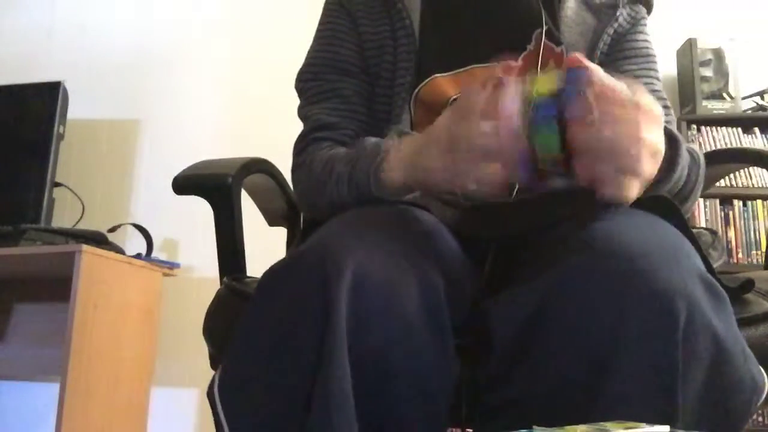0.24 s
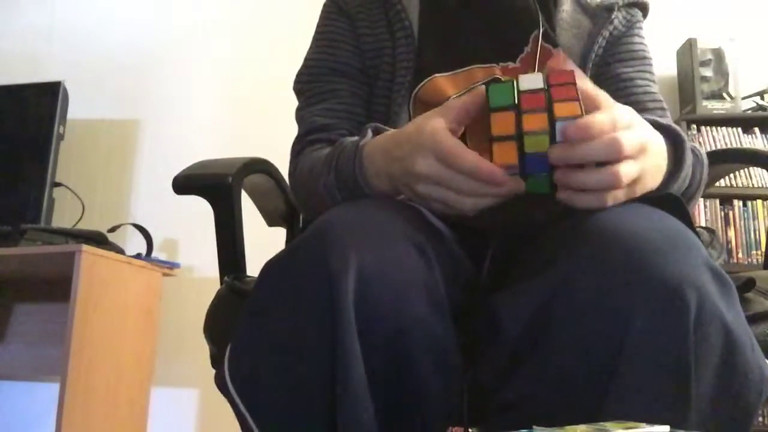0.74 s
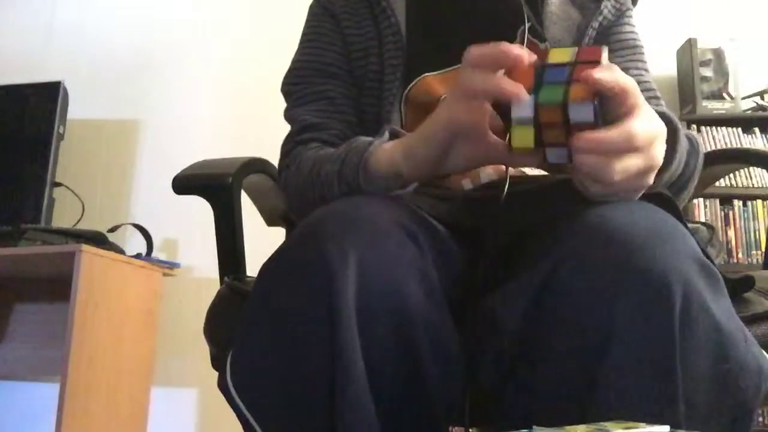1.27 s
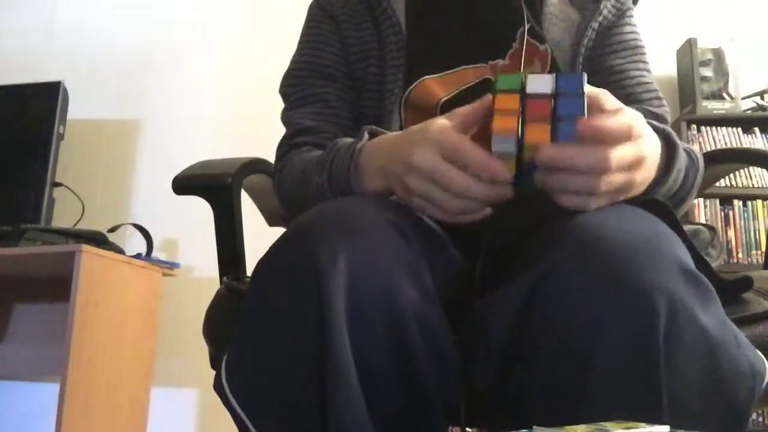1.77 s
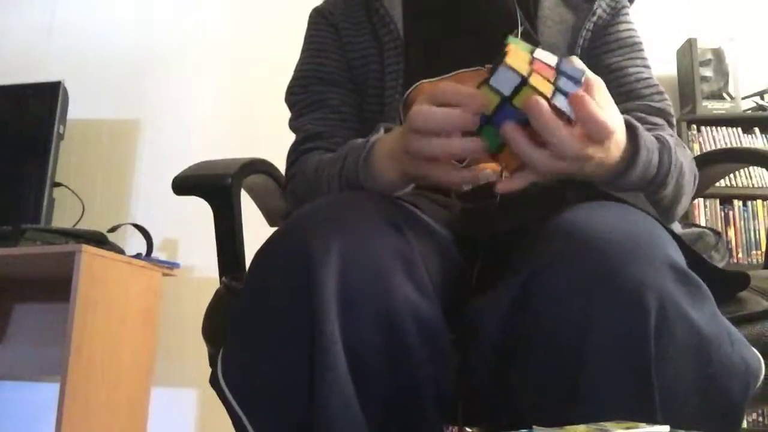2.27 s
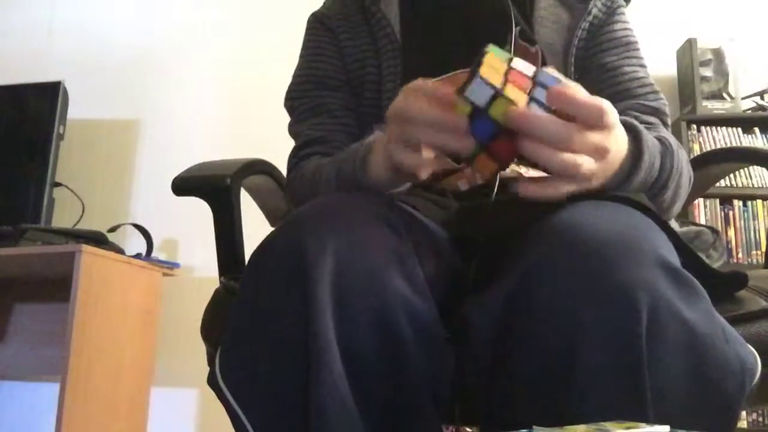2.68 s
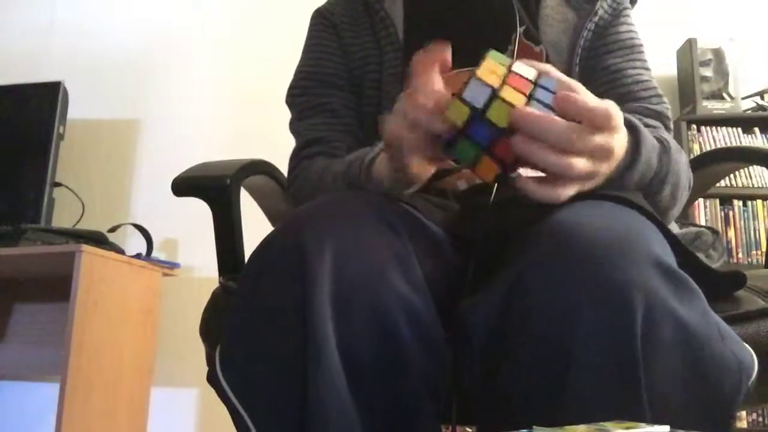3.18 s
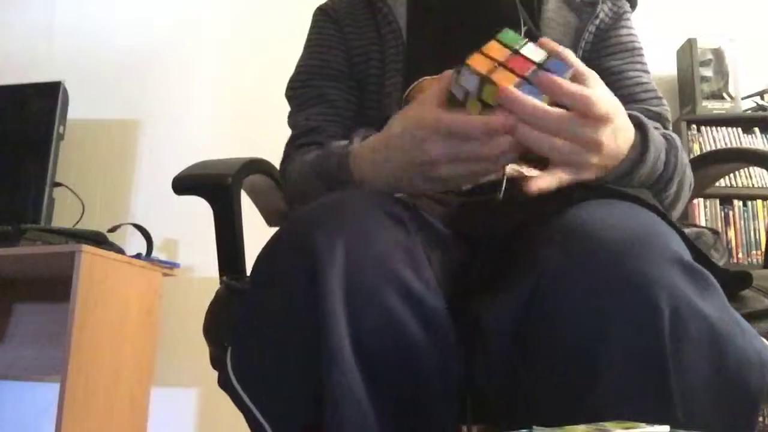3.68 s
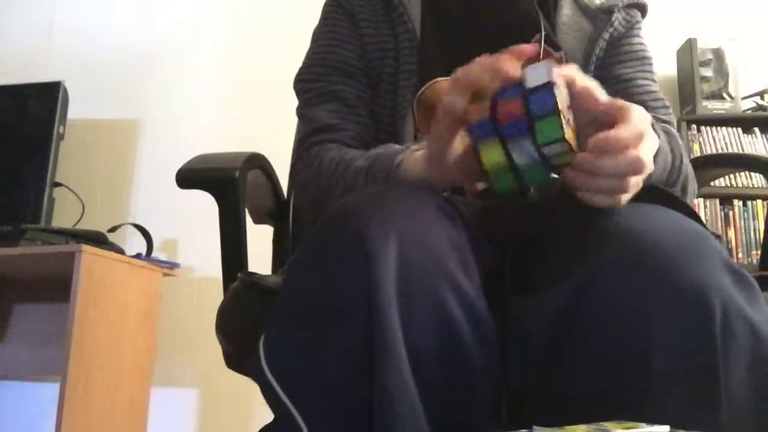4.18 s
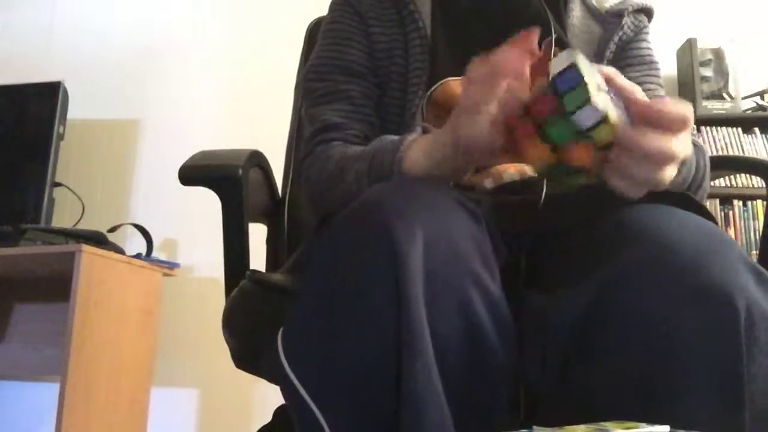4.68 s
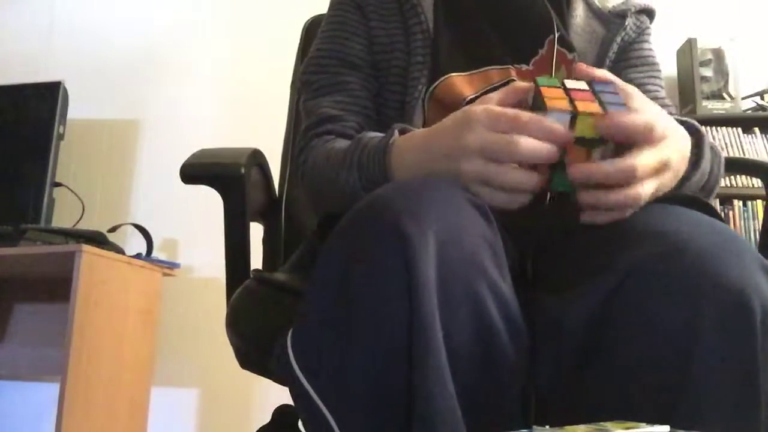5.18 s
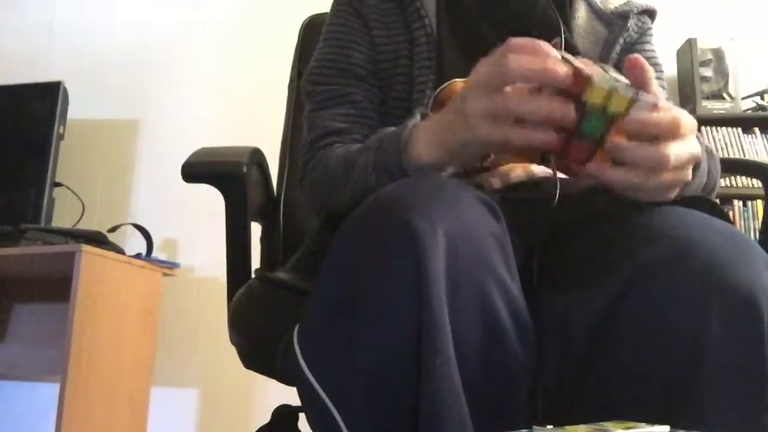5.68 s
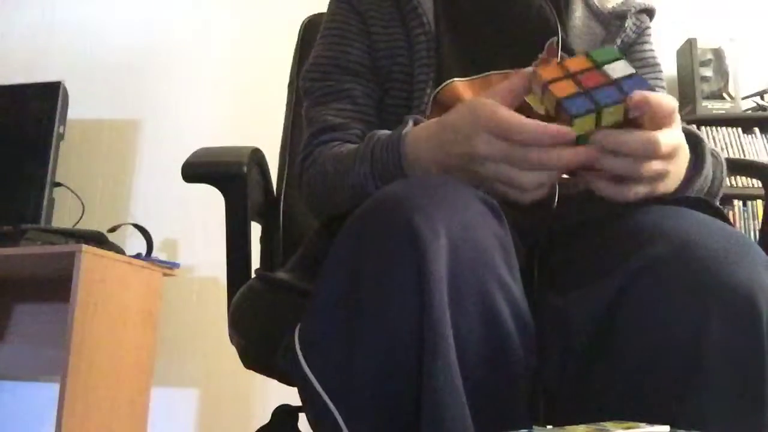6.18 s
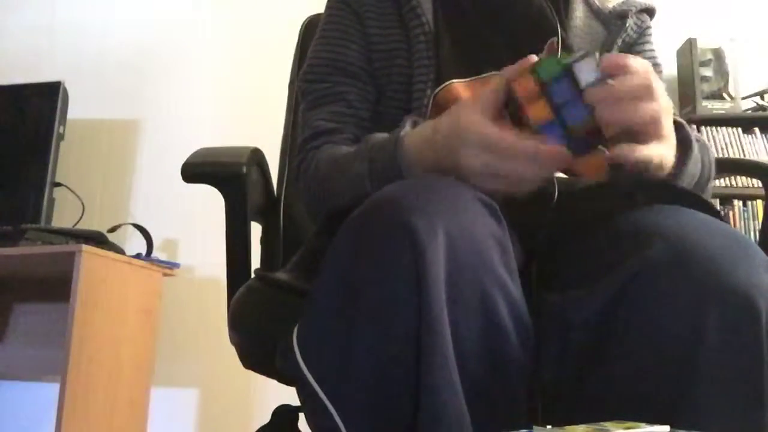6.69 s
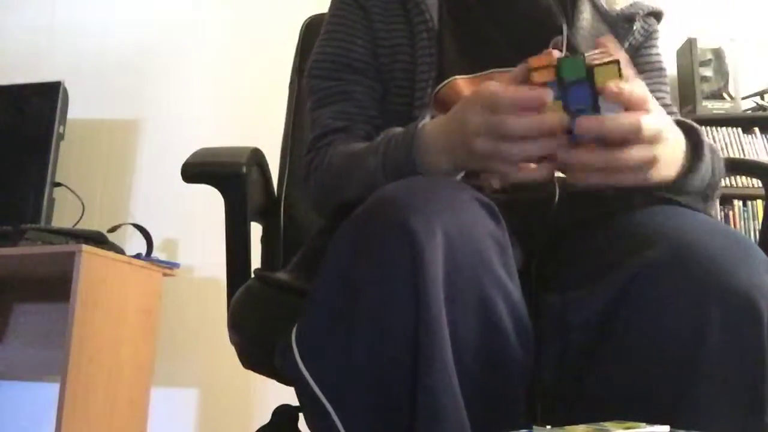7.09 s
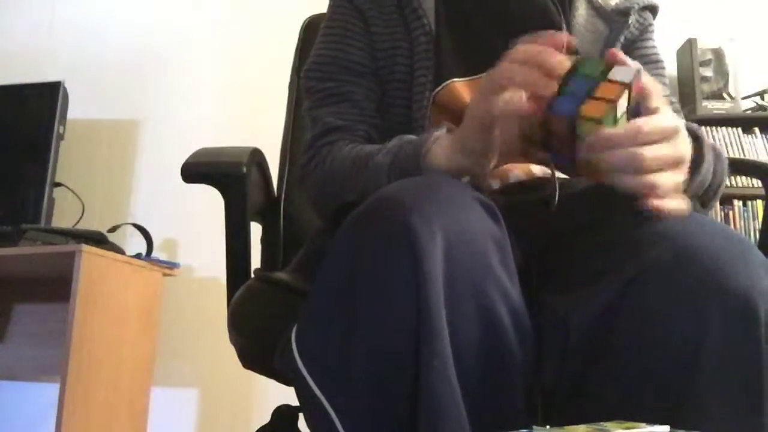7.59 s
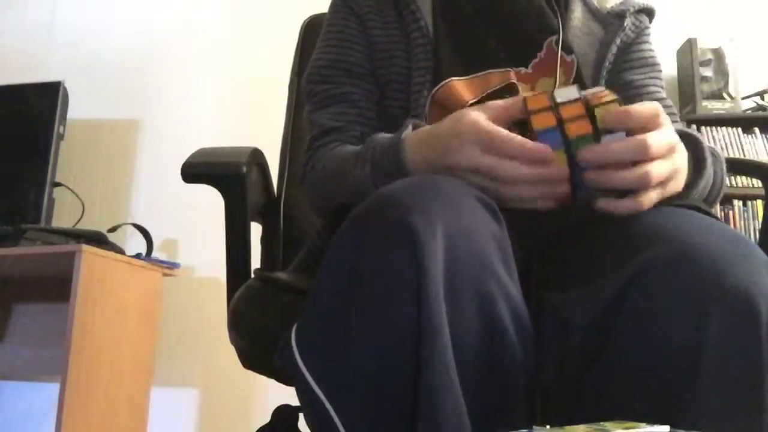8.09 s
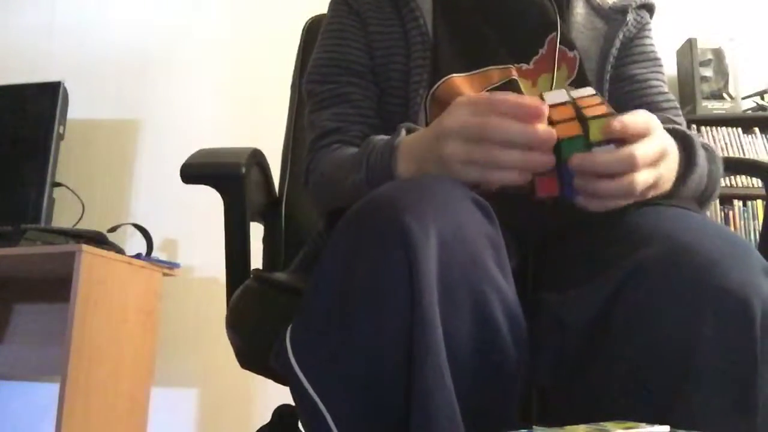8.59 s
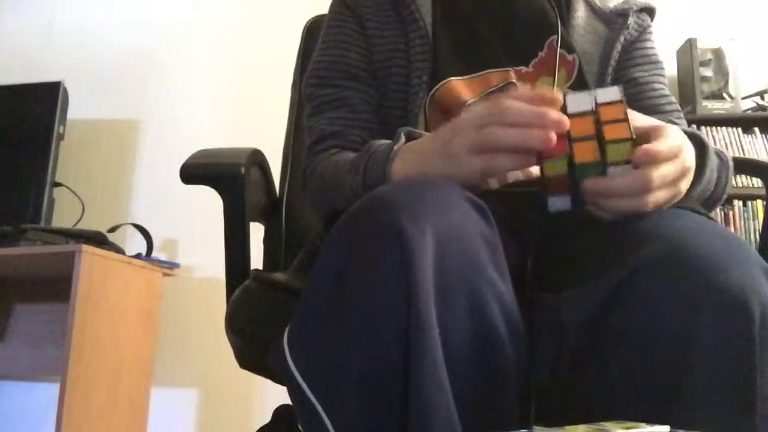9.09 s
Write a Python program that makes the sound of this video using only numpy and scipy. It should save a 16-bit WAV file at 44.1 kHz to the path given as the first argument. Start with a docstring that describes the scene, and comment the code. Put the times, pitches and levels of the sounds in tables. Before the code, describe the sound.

A plastic puzzle cube twisted in the hands, irregular clicks and clacks in bursts, a loud flurry and sharp microphone raps around seven seconds.

```python
"""Plastic puzzle cube in a live room

A cube is twisted in the hands: its pieces tick, scrape and clack as noise-driven blows ring damped modes.
Sliding layers rattle as trains of random slips; short pips and a thin spring ring are decaying sines.
The room answers with decaying noise. Near the microphone come a brush and sharp raps that ring its case.
There are also dull bumps, a boom and one faint falling squeak, a wavering sine with a rough catch.
Shaped noise makes the room air, hiss, faint hum and low rumble that lie under it all."""
import sys
import numpy as np
from scipy import signal
from scipy.fft import rfft, irfft, next_fast_len
from scipy.io import wavfile

SR = 44100
rng = np.random.default_rng(int(sys.argv[2]) if len(sys.argv) > 2 else 0)


def to_wav(sig):
    """Store sig (one row per channel, or 1-D mono) as 16-bit WAV at the path in sys.argv[1].

    Samples outside -1..1 are clipped; the rate is SR.
    """
    pcm = np.clip(np.atleast_2d(sig), -1, 1) * 32767
    pcm = np.round(pcm).astype(np.int16)
    wavfile.write(sys.argv[1], SR, pcm.T)  # frames by channels


N = 411894  # length in samples

# Prominent clacks, piece on piece: t/s, body level/dB, snap level relative to body/dB, hardness as a ring f/Hz
CLACKS = [(.111, -53.5, -3, 1460), (.165, -34.5, -7.5, 1770), (.264, -44, -18, 1660),
          (.277, -48, -21, 1560), (.286, -38, -9.5, 1630), (.328, -35, -4, 1540), (.344, -40, -19, 1870),
          (.38, -42.5, -8, 1650), (.883, -50, -11, 1500), (.903, -36.5, -13, 1470), (.998, -50, -9.5, 1430),
          (1.187, -47, -10, 1440), (1.199, -40.5, -6.5, 1700), (1.211, -38.5, -6, 1640),
          (1.233, -43.5, -5, 1500), (1.296, -51, -4.5, 1600), (1.365, -51.5, -22, 1350),
          (1.39, -48.5, -14.5, 1610), (1.453, -60, -10, 1326), (1.614, -60, -10, 1654),
          (1.724, -45.5, -5.5, 1650), (1.851, -32.5, -12.5, 1510), (1.991, -43, -37, 1460),
          (2.005, -38.5, -6, 1400), (2.123, -41.5, -6.5, 1640), (2.211, -57.5, -13, 1480),
          (2.384, -57, -7, 1570), (2.417, -59.5, -5, 1290), (2.654, -51, -7, 1640),
          (2.676, -36.5, -4, 1520), (2.762, -56.5, -16, 1500), (2.887, -56.5, 0, 1570),
          (2.965, -41, -6.5, 1520), (3.012, -45.5, -3.5, 1660), (3.034, -48.5, -2, 1420),
          (3.18, -40.5, -8, 1490), (3.193, -31, 0.5, 1540), (3.298, -44, 0.5, 1550),
          (3.583, -51.5, -7.5, 1690), (3.775, -56, 0, 1400), (3.796, -45, -2, 1620),
          (3.815, -37.5, -5, 1300), (3.826, -30, -2, 1800), (3.839, -36, -2, 1810), (3.919, -52.5, 2, 1200),
          (4.213, -43.5, -6.5, 1450), (4.533, -46, -9, 1430), (4.576, -43.5, -7.5, 1420),
          (4.615, -47, -1.5, 1470), (4.761, -49.5, -8, 1360), (4.83, -46.5, -8.5, 1630),
          (5.003, -59.5, -11, 1650), (5.179, -61, 9, 1540), (5.279, -47.5, 0, 1900),
          (5.339, -47, -6.5, 1750), (5.419, -45, -10.5, 1300), (5.545, -53.5, -17, 1670),
          (5.593, -48.5, -8.5, 1670), (5.621, -63.5, 4, 1620), (5.666, -49, 1, 1600),
          (5.677, -44.5, -15, 1540), (5.7, -37, -3, 1650), (5.8, -44, -5, 1750), (5.988, -59.5, -1, 1800),
          (6.172, -46.5, -4.5, 1360), (6.35, -53, -14, 1540), (6.466, -45, -5, 1530), (6.482, -44, 0, 1650),
          (6.53, -41.5, -4, 1580), (6.646, -28, 2.5, 1470), (6.66, -30.5, -1, 1470),
          (6.669, -38.5, 6.5, 1600), (6.689, -29.5, -2.5, 1490), (6.78, -39, -4, 1950),
          (6.795, -35, -12.5, 1710), (6.817, -49.5, -4.5, 1550), (6.836, -42, 3, 1670),
          (6.847, -42, -2.5, 1820), (6.897, -41, -3, 1770), (6.915, -32, -7.5, 1690), (6.923, -40, 5, 1540),
          (6.93, -31.5, 2.5, 1700), (6.944, -23.5, 4, 1760), (6.951, -31, 1, 1600), (7.323, -51, -4, 1580),
          (7.338, -47, -1.5, 1570), (7.367, -37.5, -1.5, 1480), (7.381, -37.5, -10, 1870),
          (7.477, -34.5, -1, 1370), (7.507, -34.5, -5, 1750), (7.52, -42, -4, 1440),
          (7.58, -39.5, -7, 1700), (7.614, -49, 10, 1380), (7.643, -46.5, -3, 1980), (7.697, -44, -7, 1490),
          (7.717, -32, -7, 1390), (7.728, -40, 0, 1520), (7.756, -33.5, 2, 1570), (7.766, -42, -2, 1370),
          (7.844, -49.5, 3, 1400), (7.88, -42, -4, 1510), (7.887, -38.5, -3.5, 1660),
          (7.974, -43.5, -5, 1580), (7.991, -38.5, -14, 1490), (8.021, -37.5, -1.5, 1400),
          (8.034, -35.5, -2.5, 1530), (8.211, -51.5, -13, 1550), (8.261, -53, -5, 1850),
          (8.368, -47, -7.5, 1610), (8.52, -55, -13.5, 1470), (8.697, -46.5, -6.5, 1630),
          (8.709, -45, -13, 1610), (8.839, -41, -20, 1590), (9.206, -42.5, -12, 1450),
          (9.216, -37.5, -10.5, 1400), (9.245, -47, -15, 1580), (9.305, -46.5, -18, 1500)]
# Modes of the hollow cube: f/Hz, nominal width/Hz, relative level/dB
BODY_MODES = [(584, 210, -14), (847, 110, -5), (1164, 134, -2), (1395, 245, 2), (1550, 283, 2),
              (1822, 266, -3), (2244, 380, -12), (2960, 420, -16)]
# Modes of the pieces' thin walls: f/Hz, nominal width/Hz, relative level/dB
WALL_MODES = [(3850, 570, -5.5), (4676, 900, -2.5), (5965, 1110, 3.5), (6883, 650, 0.5), (8300, 640, -6.5),
              (10650, 400, -8), (11240, 410, -13), (14800, 1500, -31)]
BODY_HZ = 1550  # ring frequency of a contact of middling hardness
LEAD = SR // 250  # samples of scrape before a blow
SPAN = 2048  # samples in a whole contact

# Pushes of the fingers that slide a layer: start t/s, length/s, effort level/dB
PUSHES = [(.095, 0.082, -53.5), (.25, 0.039, -49.5), (.285, 0.076, -40), (.835, 0.1, -60),
          (.95, 0.089, -76), (1.2, 0.044, -46.5), (1.34, 0.087, -65), (1.825, 0.041, -57),
          (1.96, 0.32, -68), (2.365, 0.035, -61.5), (2.645, 0.035, -54.5), (2.97, 0.074, -51),
          (3.145, 0.039, -52), (3.25, 0.086, -56.5), (3.595, 0.051, -51), (3.78, 0.033, -49),
          (3.815, .03, -43.5), (3.9, 0.066, -55.5), (4.185, 0.073, -56), (4.525, 0.13, -50.5),
          (4.7, 0.097, -65.5), (5, 0.19, -68), (5.385, 0.051, -55.5), (5.67, 0.053, -47.5),
          (5.765, 0.055, -54.5), (6.44, 0.12, -50), (6.63, 0.084, -44.5), (6.785, .07, -42),
          (6.91, .045, -31), (7.16, 0.18, -62.5), (7.345, .04, -45.5), (7.45, 0.068, -46),
          (7.57, 0.076, -43.5), (7.73, 0.038, -36), (7.85, 0.078, -46), (7.985, 0.062, -46),
          (8.19, .34, -59.5), (8.675, 0.081, -59), (8.81, 0.11, -51.5), (9.22, 0.087, -51)]
PUSH_ATTACK_S, PUSH_RELEASE_S = 0.0089, 0.0084  # time constants
HOLD_DB = -83.5  # effort of fingers that merely hold the cube
TICKS_PER_S = 75

# Short, dry pips of a single small part: t/s, starting level/dB, f/Hz
PIPS = [(6.6235, -38, 2100), (6.7262, -30, 2050), (6.8317, -30.5, 2230), (7.553, -32, 2500),
        (8.1300, -36, 2440), (8.4317, -28, 2200)]
# The hardest jolts set a spring in the core singing: t/s, starting level/dB, t60/s
SPRING_JOLTS = [(6.914, -34, .2), (6.943, -33, .17), (7.053, -30, 0.13), (7.103, -30, 0.11)]
SPRING_HZ = 1368

# Reverberation of the room: f/Hz, t60/s
ROOM_DECAY = [(300, 0.35), (1200, 0.49), (3000, 0.45), (6500, 0.43), (10000, 0.31), (15000, 0.09)]
# Colour of the room's tail: f/Hz, relative level/dB
ROOM_COLOUR = [(300, 18), (800, 3), (1500, -4.5), (3000, -2.5), (6500, -2), (10500, -6), (12500, -10.5),
               (16000, -21)]

# Strokes over the microphone: start t/s, length/s, level at the end/dB
BRUSHES = [(7.053, .018, -27.5), (7.088, .024, -23.5)]
BRUSH_SWELL_DB, BRUSH_ATTACK_S, BRUSH_RELEASE_S = 8.5, 0.0018, 0.0048  # a stroke presses harder as it goes
# Resonances that colour the brush: f/Hz, width/Hz, relative level/dB
BRUSH_MODES = [(1160, 370, 2.0), (2040, 470, 3.0), (3100, 1000, -8)]
# Raps on the microphone: t/s, spike level/dB, Gaussian contact time/s, case ring relative to spike/dB
RAPS = [(7.0907, -19.5, .00008, -12), (7.0984, 2, 0.000022, -23), (7.1020, 0, 0.000045, -9.5),
        (7.1072, -7, 0.000052, -20.5), (7.1087, -13, 0.000034, -5.5), (7.1102, -15, 0.000064, -9.5),
        (7.1119, -16, 0.000032, -7.5), (7.1130, -18, 0.000094, -12), (7.1140, -8, 0.000041, -25),
        (7.1257, -28.5, 0.000083, -13)]
# Modes of the microphone's case: f/Hz, relative level/dB, t60/s
CASE_MODES = [(1210, -9.5, 0.03), (3630, -3.5, 0.01), (4970, -11, 0.022), (7280, -7.5, 0.0055),
              (8500, -8.5, 0.0052)]

# Dull bumps of a body shifting: t/s, envelope peak level/dB, rise/s, lower edge f/Hz, upper edge f/Hz
BUMPS = [(3.244, -61, .003, 150, 600), (3.338, -72, 0.0027, 120, 500), (3.879, -83, 0.039, 50, 138),
         (4.32, -51, 0.034, 59.7, 162), (6.975, -55, 0.0035, 200, 606), (7.669, -44.5, 0.029, 90, 218),
         (7.75, -49, 0.04, 60, 93.5), (8.377, -50, .028, 70.5, 173), (8.927, -60, 0.036, 81, 157)]
# One deep boom: t/s, envelope peak level/dB, f/Hz, half length/s
BOOM = (7.716, -23, 75, .027)
# Path of a faint squeak: t/s, mean f/Hz, mean level/dB
SQUEAK_PATH = [(4.81, 473, -85), (4.84, 457, -68), (4.879, 444, -55), (4.94, 422, -60.5), (5.01, 407, -67),
               (5.06, 411, -64.5), (5.14, 410, -81)]
# The squeak's rough catch: t/s, level/dB, half length/s, f/Hz
CATCH = (4.925, -66, .028, 660)

# Spectrum of room air and hiss: f/Hz, relative level per Hz/dB
AIR_SPECTRUM = [(30, -13.5), (70, 10), (150, 2), (270, 0.5), (370, 5.5), (520, -1), (1000, -2), (2000, -17),
                (4000, -11.5), (10000, -15.5), (16000, -21.5)]
# Swells of a faint hum: t/s, level/dB, half length/s
HUM_SWELLS = [(1.92, -71.5, 0.28), (4.2, -72, 0.13), (5.8, -73, 0.36), (9.3, -70, 0.18)]
# Spectrum of moving air at the microphone: f/Hz, relative level per Hz/dB
RUMBLE_SPECTRUM = [(8, 2), (16, 11), (28, -12.5), (50, -12), (90, -27.5), (200, -32.5), (600, -92.5)]
# Wafts of air from the arms: t/s, level/dB, half length/s
WAFTS = [(1.47, -68, 0.1), (3.42, -50, 0.18), (3.94, -40, .11), (4.4, -50, 0.28), (5.9, -55, 0.6),
         (6.78, -49, 0.16), (7.09, -30, 0.082), (7.7, -45, 0.29), (8.42, -51, 0.14), (9.01, -52, .06)]
DRAUGHT_DB = -58  # rumble between the wafts

CLIP_TOP = .97  # saturation ceiling, full scale 1
TOP_HZ = 16100  # upper band limit


def amp(db):
    """Level law: decibels to amplitude gain."""
    return 10 ** (np.asarray(db) / 20)


def unit(x):
    """Normalisation: scale to rms 1."""
    return x / np.sqrt(np.mean(x ** 2) + 1e-20)


def along(points, hz):
    """Interpolation of (f, value) points on a logarithmic frequency axis."""
    f, v = np.transpose(points)
    return np.interp(np.log(hz + 1), np.log(f + 1), v)


def curves(rows):
    """Linear interpolation in time: one value per sample for each column after the time."""
    s, *cols = np.transpose(rows)
    return [np.interp(np.arange(N) / SR, s, c) for c in cols]


def filtered(x, response):
    """Linear filtering: the spectrum of x times a response of frequency."""
    m = next_fast_len(len(x) + SR // 2, True)
    spectrum = rfft(x, m) * response(np.fft.rfftfreq(m, 1 / SR))
    return irfft(spectrum, m)[:len(x)]


def noise(response, size=N):
    """Coloured noise: white noise shaped by a response, at rms 1."""
    return unit(filtered(rng.standard_normal(size), response))


def resonances(modes, f, low_hz):
    """Modal superposition: damped resonators of alternating sign, falling steeply below low_hz."""
    ring = 0
    for k, (centre, width, db) in enumerate(modes):
        damping = 1j * f * width
        ring = ring + (-1) ** k * amp(db) * damping / (centre * centre - f * f + damping)
    return ring * (1j * f / (low_hz + 1j * f)) ** 2


def add(track, s, sound):
    """Linear superposition: mix a sound in at time s."""
    start = int(np.clip(round(s * SR), 0, N - 1))
    track[start:start + len(sound)] += sound[:N - start]


def strokes(rows, attack_s, release_s, swell_db):
    """Exponential attack and release: gain of (start, length, dB) strokes that swell to full level."""
    out = np.zeros(N)
    t = np.arange(-SR // 10, SR // 2) / SR
    for s, length_s, db in rows:
        edges = np.exp(np.minimum(t, 0) / attack_s - np.maximum(t - length_s, 0) / release_s)
        swell = swell_db * (np.clip(t / length_s, 0, 1) - 1)
        add(out, s + t[0], edges * amp(db + swell))
    return out


def swells(rows):
    """Gaussian envelopes: gain of bell-shaped (time, dB, half length) swells."""
    t = np.arange(N) / SR
    return sum(amp(db) * np.exp(-np.minimum(((t - s) / half_s) ** 2, 20)) for s, db, half_s in rows)


def contact(modes, low_hz, chatter_db, chatter_t60, vary_db, damping=0.86, detune=0.028,
            lead_db=-20, lead_t60=0.012):
    """Impact excitation: a piece scrapes to its stop, strikes and chatters, driving damped modes."""
    t = (np.arange(SPAN) - LEAD) / SR
    grip_db = np.where(t < 0, lead_db + 60 * t / lead_t60, chatter_db - 60 * t / chatter_t60)
    force = amp(grip_db) * rng.standard_normal(SPAN) * rng.exponential(1, SPAN)
    force[LEAD] += 1.8  # the blow itself
    # each spot and grip rings its own mix of the modes, damped by the fingers
    struck = []
    for hz, width, db in modes:
        mode_hz = hz * np.exp(detune * rng.standard_normal())
        struck.append((mode_hz, width * damping, db + vary_db * rng.standard_normal()))
    ring = irfft(rfft(force) * resonances(struck, np.fft.rfftfreq(SPAN, 1 / SR), low_hz))
    around_blow = ring[LEAD - LEAD // 4:2 * LEAD - LEAD // 4]  # about 4 ms, brought to rms 1
    return ring / np.sqrt(np.mean(around_blow ** 2))


def clicks(contacts, body_db=0, shell_db=0, tilt_db=32, stop_s=.0006, sharpen=0.32, shell_hz=6000):
    """Modal response to impact: each contact knocks the hollow body and snaps the thin walls."""
    out = np.zeros(N)
    for s, db, snap_db, hz in contacts:
        tilt = tilt_db * np.log2(hz / BODY_HZ)  # harder contacts favour the higher modes
        modes = [(c, w, level + tilt * np.clip(np.log2(c / BODY_HZ), -.5, .5))
                 for c, w, level in BODY_MODES]
        # a stronger snap also shifts the walls' balance upward
        walls = [(c, w, level + sharpen * snap_db * np.log2(c / shell_hz)) for c, w, level in WALL_MODES]
        body = contact(modes, low_hz=520, chatter_db=-22, chatter_t60=0.026, vary_db=1.5)
        shell = contact(walls, low_hz=1500, chatter_db=-5, chatter_t60=0.019, vary_db=1.5)
        sound = amp(db + body_db) * body + amp(db + snap_db + shell_db) * shell
        add(out, s + stop_s - LEAD / SR, sound)
    return out


def ticks(effort, tick_db=-3, spread_db=3, stray_db=-85, stray_spread_db=7.5, snap_db=-5.5,
          snap_spread_db=2.0, snap_per_db=0.28, usual_db=-50, ring_hz=1540, ring_spread=0.15):
    """Random small impacts, as rows like CLACKS: louder and brighter under a push, else loose pieces."""
    count = int(N / SR * TICKS_PER_S)
    s = (np.arange(count) + rng.random(count)) / TICKS_PER_S  # one at a random time in each slot
    size, snap, ring = np.clip(rng.standard_normal((count, 3)), -2, 2).T
    push_db = 20 * np.log10(np.interp(s, np.arange(N) / SR, effort))
    loose_db = stray_db + stray_spread_db * np.minimum(rng.exponential(1, count), np.pi)
    db = np.maximum(push_db + tick_db + spread_db * size, loose_db)
    brightness_db = snap_db + snap_per_db * (push_db - usual_db) + snap_spread_db * snap
    return np.transpose([s, db, brightness_db, ring_hz * np.exp(ring_spread * ring)])


def blows(contacts, body_db=0, shell_db=0):
    """Impulse idealisation: contacts as a train of knocks on the body and one of snaps on the walls."""
    knocks, snaps = np.zeros(N), np.zeros(N)
    for s, db, snap_db, _ in contacts:
        add(knocks, s, [amp(db + body_db)])
        add(snaps, s, [amp(db + snap_db + shell_db)])
    return knocks, snaps


def slide(effort, rattle_db=-1, body_db=-6, shell_db=-16, jostle_db=-16, jostle_s=0.013):
    """Stick-slip friction: sliding layers catch in many tiny slips, with more force around each clack."""
    rate, spread_db = 280, 5  # mean slips per second, spread of their sizes
    knocks, _ = blows(CLACKS)
    near = np.exp(-abs(np.arange(-SR // 10, SR // 10)) / SR / jostle_s)
    jostle = abs(signal.fftconvolve(knocks ** 2, near, "same"))
    level = np.sqrt((amp(rattle_db) * effort) ** 2 + amp(jostle_db) ** 2 * jostle)
    slip_size = amp(spread_db * np.clip(rng.standard_normal(N), -2, 2))
    slips = (rng.random(N) < rate / SR) * rng.choice([-1, 1], N) * slip_size
    body = unit(filtered(slips, lambda f: resonances(BODY_MODES, f, low_hz=900)))
    shell = unit(filtered(slips, lambda f: resonances(WALL_MODES, f, low_hz=1500)))
    return level * (amp(body_db) * body + amp(shell_db) * shell)


def pips(t60=0.0068, rise_s=0.000083):
    """Free decay of one heavily damped mode for each pip."""
    out, t = np.zeros(N), np.arange(SPAN) / SR
    for s, db, hz in PIPS:
        envelope = amp(db - 60 * t / t60) * (1 - np.exp(-t / rise_s))
        add(out, s, envelope * np.sin(2 * np.pi * hz * t))
    return out


def spring():
    """Free decay of a lightly damped mode: a thin ring that outlasts the plastic's clack."""
    out, t = np.zeros(N), np.arange(SR // 2) / SR
    for s, db, t60 in SPRING_JOLTS:
        add(out, s, amp(db - 60 * t / t60) * np.sin(2 * np.pi * SPRING_HZ * t))
    return out


def radiated(contacts, blur=1.73):
    """Power summation over all directions: the clicks' modes reach the room blurred into broad humps."""
    def humps(modes, f, low_hz):
        """Incoherent sum of the widened modes' powers."""
        power = sum(abs(resonances([(c, w * blur, db)], f, low_hz)) ** 2 for c, w, db in modes)
        return unit(np.sqrt(power))

    knocks, snaps = blows(contacts, body_db=-4.5, shell_db=-2.5)
    body = filtered(knocks, lambda f: humps(BODY_MODES, f, low_hz=346))
    shell = filtered(snaps, lambda f: humps(WALL_MODES, f, low_hz=1510))
    return np.sqrt(LEAD) * (body + shell)  # each blow carries the energy of about 4 ms of sound


def room(x, wet_db=-6, build_s=0.0016, count=30):
    """Diffuse-field decay: convolution with noise tails that change as the cube moves about."""
    out = np.zeros(N)
    for here in np.array_split(np.arange(N), count):
        hz, t, z = signal.stft(rng.standard_normal(SR * 3 // 4), SR, nperseg=256)
        decay_db = along(ROOM_COLOUR, hz)[:, None] - 60 * t / along(ROOM_DECAY, hz)[:, None]
        tail = signal.istft(z * amp(decay_db), SR, nperseg=256)[1]
        tail *= 1 - np.exp(-(np.arange(len(tail)) / SR / build_s) ** 2)  # reflections build up
        add(out, here[0] / SR, signal.fftconvolve(x[here], tail / np.linalg.norm(tail)))
    return amp(wet_db) * out


def brush():
    """Friction noise: dry strokes over the microphone, coloured by broad resonances."""
    pressure = strokes(BRUSHES, BRUSH_ATTACK_S, BRUSH_RELEASE_S, BRUSH_SWELL_DB)
    return pressure * noise(lambda f: resonances(BRUSH_MODES, f, low_hz=500) / (1 + (f / 6000) ** 4))


def raps(lead_s=0.00023):
    """Impulse response of the case: one-sided pressure spikes, each followed by decaying modes."""
    out = np.zeros(N)
    t = np.arange(SR // 20) / SR - lead_s
    after = np.maximum(t, 0)
    ring = sum(amp(level - 60 * after / t60) * np.sin(2 * np.pi * hz * after)
               for hz, level, t60 in CASE_MODES)
    for s, db, width_s, ring_db in RAPS:
        spike = np.exp(-.5 * (t / width_s) ** 2)
        add(out, s - lead_s, amp(db) * (spike + amp(ring_db) * ring))
    return out


def microphone_touch():
    """First-order high-pass at 140 Hz: the brush and raps lose their slow pressure."""
    return filtered(brush() + raps(), lambda f: 1j * f / (140 + 1j * f))


def bumps():
    """Band-limited transients: soft low thuds that swell and fade."""
    out, t = np.zeros(N), np.arange(SR // 2) / SR
    for s, db, rise_s, low_hz, top_hz in BUMPS:
        thud = noise(lambda f: 1 / (1 + (f / top_hz) ** 5) * f ** 3 / (f ** 3 + low_hz ** 3), size=len(t))
        add(out, s, amp(db) * t / rise_s * np.exp(1 - t / rise_s) * thud)
    return out


def boom():
    """Gaussian wave packet: a brief deep sine."""
    s, db, hz, half_s = BOOM
    u = np.arange(N) / SR - s
    return amp(db) * np.exp(-(u / half_s) ** 2) * np.sin(2 * np.pi * hz * u)


def squeak(waver=0.013, flutter_db=3):
    """Frequency and amplitude modulation: a thin, unsteady tone that sags in pitch, with a rough catch."""
    def tremble():
        """Slow random modulation."""
        return noise(lambda f: np.exp(-(f / 45) ** 2))

    t = np.arange(N) / SR
    hz, db = curves(SQUEAK_PATH)
    inside = np.interp(t, [SQUEAK_PATH[0][0], SQUEAK_PATH[-1][0]], [1, 1], 0, 0)
    level = inside * amp(db + flutter_db * tremble())
    phase = 2 * np.pi * np.cumsum(hz * (1 + waver * tremble())) / SR
    tone = level * np.sqrt(2) * np.sin(phase)
    s, catch_db, half_s, catch_hz = CATCH
    rasp = noise(lambda f: resonances([(catch_hz, 220, 0)], f, low_hz=300) ** 2)
    return tone + amp(catch_db) * np.exp(-((t - s) / half_s) ** 2) * rasp


def air(air_db=-71):
    """Stationary noise: steady room air and microphone hiss."""
    return amp(air_db) * noise(lambda f: amp(along(AIR_SPECTRUM, f)))


def hum():
    """Narrow-band noise: a faint hum around 383 Hz that swells and fades."""
    return swells(HUM_SWELLS) * noise(lambda f: resonances([(383, 127, 0)], f, low_hz=201) ** 2)


def rumble():
    """Power addition of a steady draught and wafts: low noise that follows the arms' movement."""
    level = np.hypot(amp(DRAUGHT_DB), swells(WAFTS))
    return level * noise(lambda f: amp(along(RUMBLE_SPECTRUM, f)))


def scene():
    """Superposition of direct and reverberant sound: the cube in its room, plus the other layers."""
    effort = amp(HOLD_DB) + strokes(PUSHES, PUSH_ATTACK_S, PUSH_RELEASE_S, swell_db=0.0)
    contacts = np.vstack([CLACKS, ticks(effort)])
    rattle = slide(effort)
    direct = clicks(contacts) + pips() + spring() + rattle
    cube = direct + room(radiated(contacts) + rattle)
    background = air() + hum() + rumble()
    return (cube + microphone_touch() + bumps() + boom() + squeak() + background)[None]


def record(dry):
    """Saturation and band limiting: the input flattens the hardest raps and cuts steeply above TOP_HZ."""
    held = dry[0] / (1 + (dry[0] / CLIP_TOP) ** 8) ** (1 / 8)
    return filtered(held, lambda f: 1 / np.sqrt(1 + (f / TOP_HZ) ** 160))[None]


dry = scene()
out = record(dry)
to_wav(out)
```